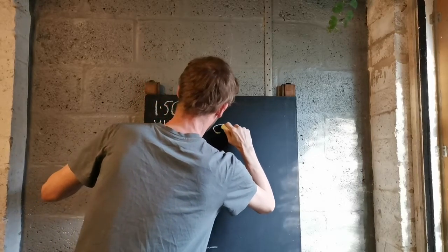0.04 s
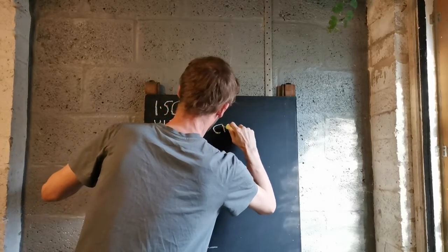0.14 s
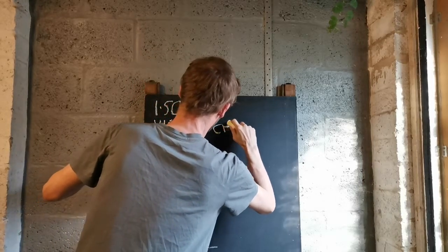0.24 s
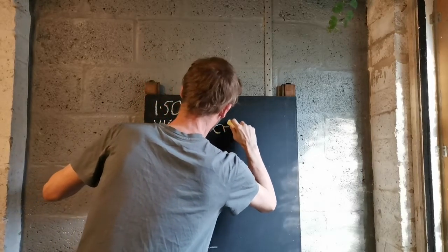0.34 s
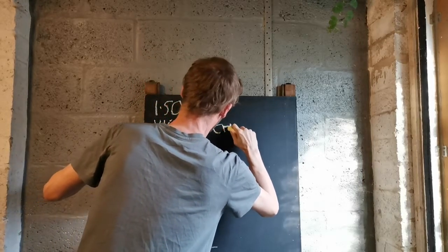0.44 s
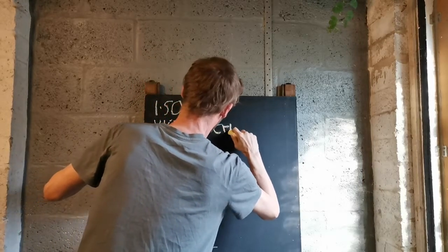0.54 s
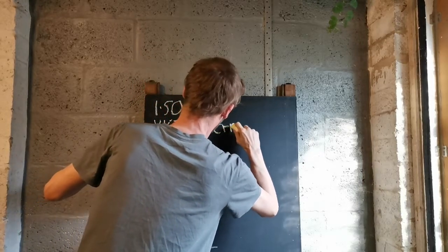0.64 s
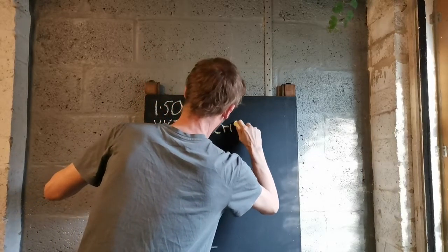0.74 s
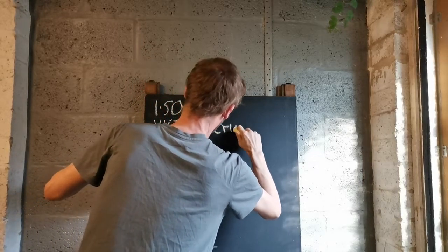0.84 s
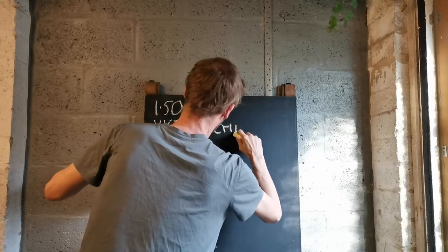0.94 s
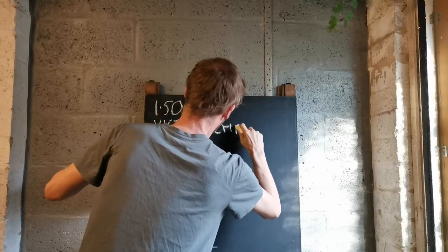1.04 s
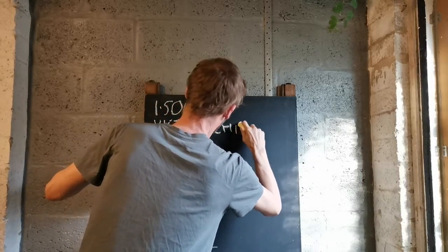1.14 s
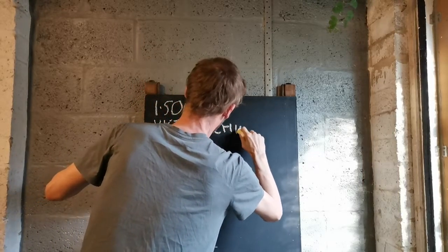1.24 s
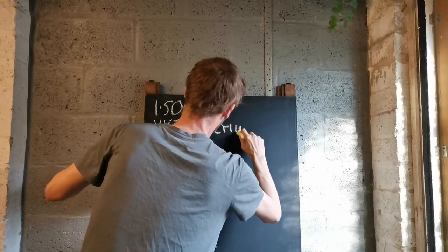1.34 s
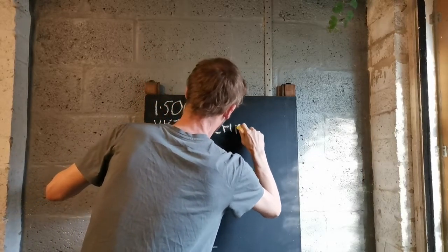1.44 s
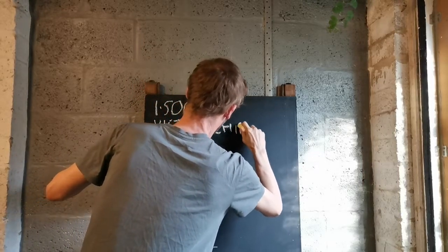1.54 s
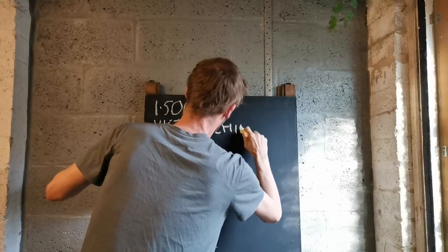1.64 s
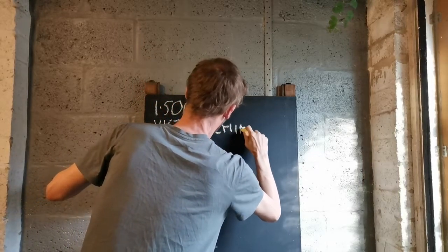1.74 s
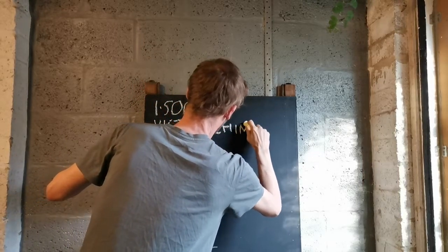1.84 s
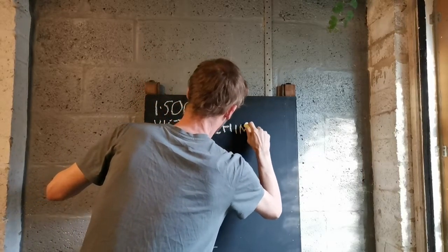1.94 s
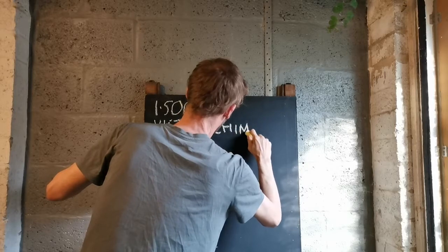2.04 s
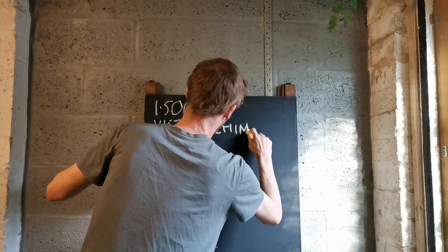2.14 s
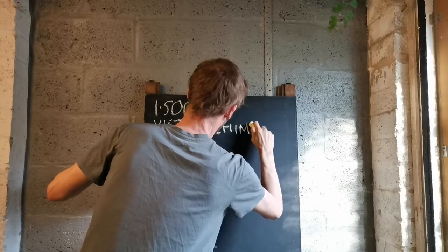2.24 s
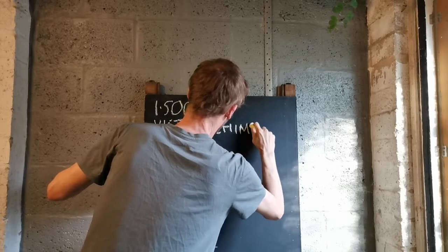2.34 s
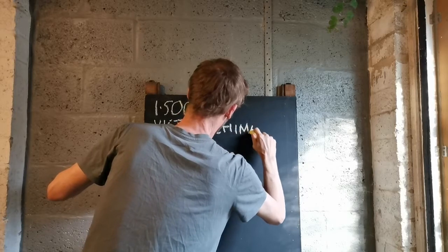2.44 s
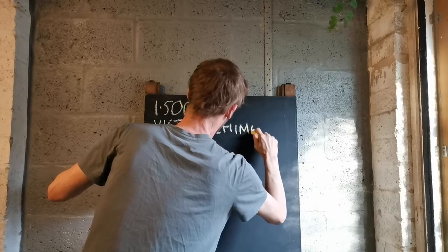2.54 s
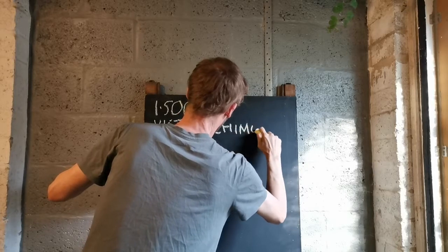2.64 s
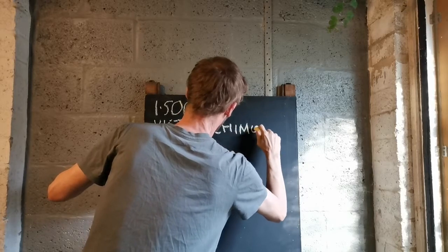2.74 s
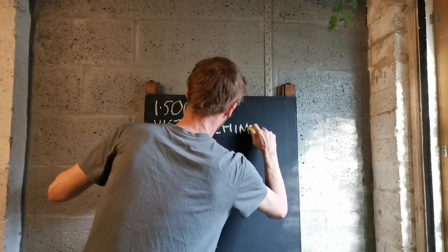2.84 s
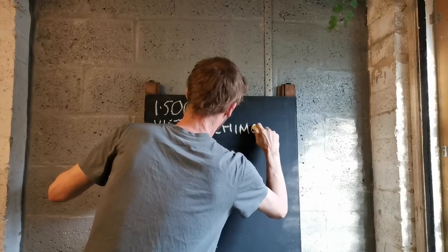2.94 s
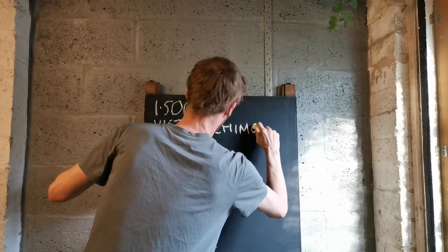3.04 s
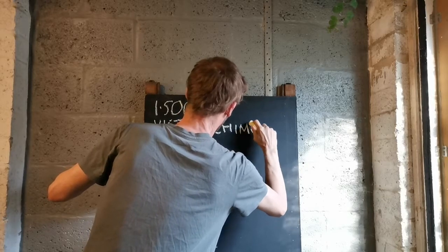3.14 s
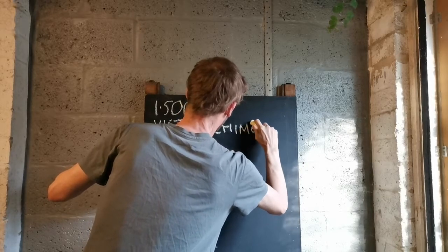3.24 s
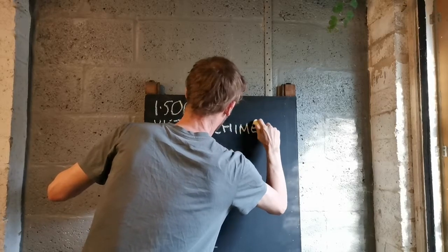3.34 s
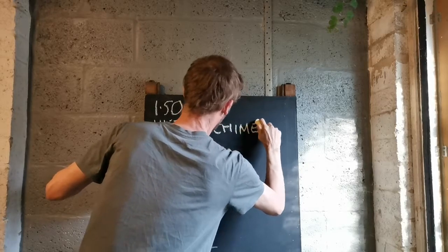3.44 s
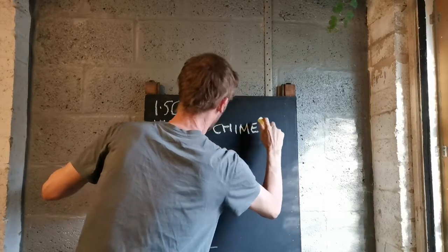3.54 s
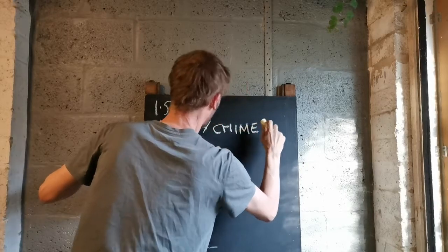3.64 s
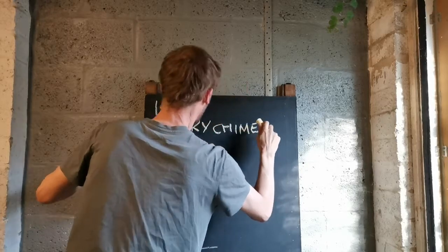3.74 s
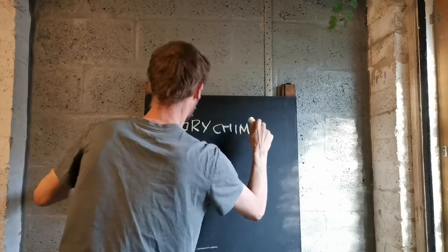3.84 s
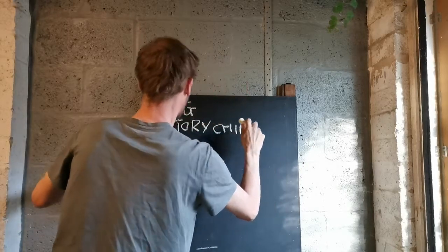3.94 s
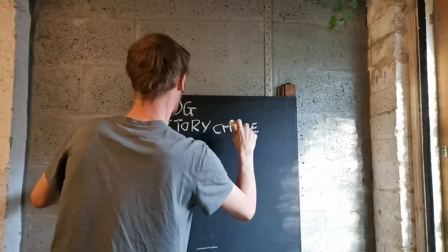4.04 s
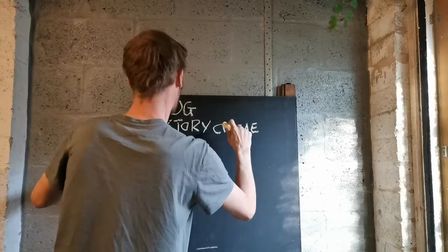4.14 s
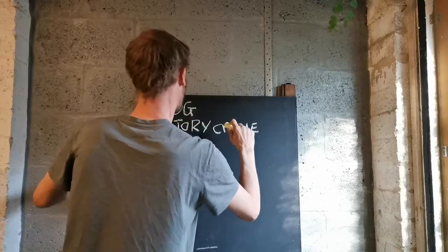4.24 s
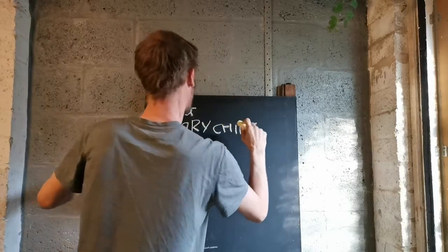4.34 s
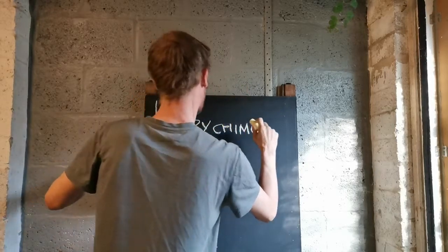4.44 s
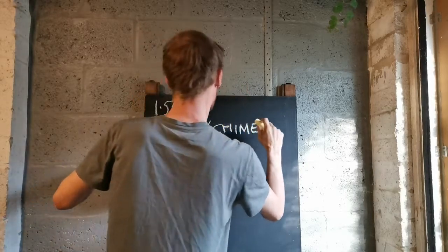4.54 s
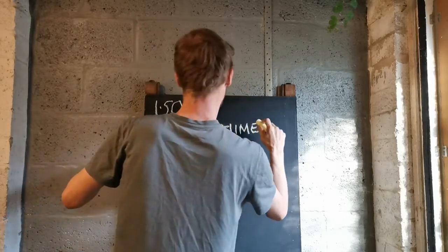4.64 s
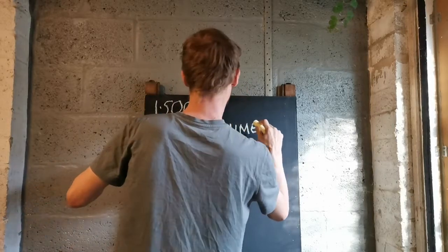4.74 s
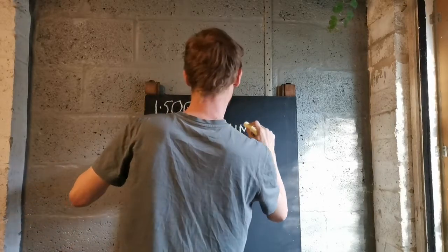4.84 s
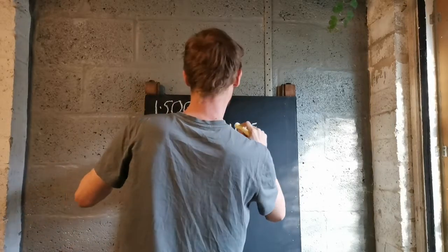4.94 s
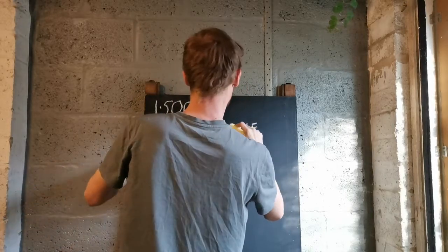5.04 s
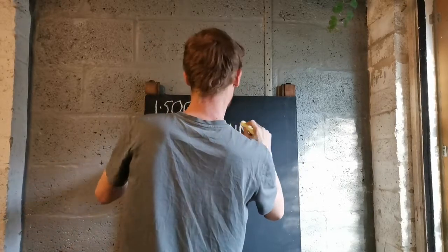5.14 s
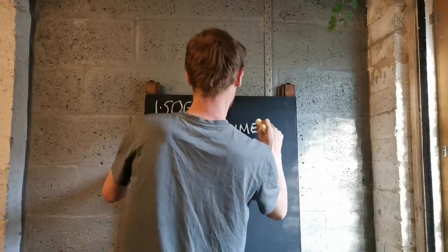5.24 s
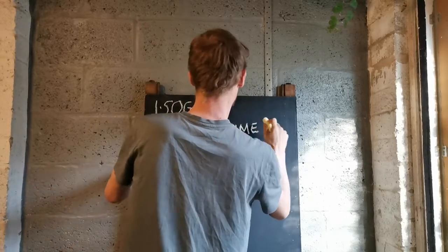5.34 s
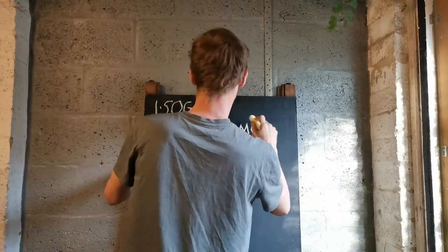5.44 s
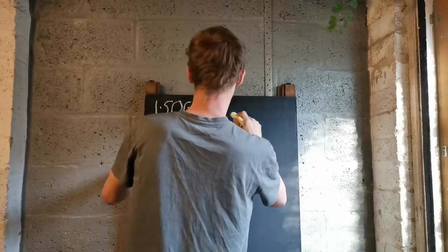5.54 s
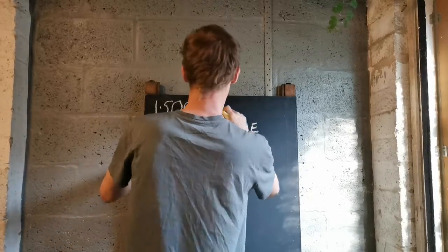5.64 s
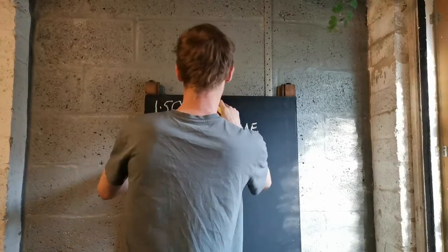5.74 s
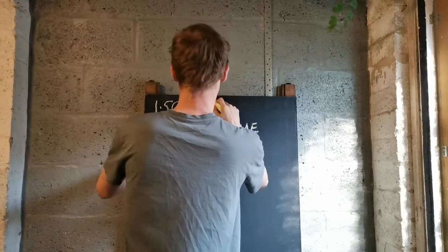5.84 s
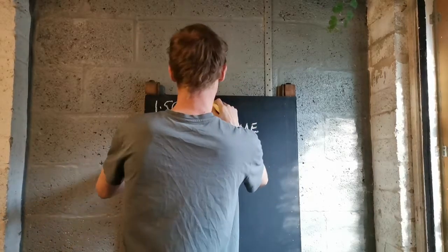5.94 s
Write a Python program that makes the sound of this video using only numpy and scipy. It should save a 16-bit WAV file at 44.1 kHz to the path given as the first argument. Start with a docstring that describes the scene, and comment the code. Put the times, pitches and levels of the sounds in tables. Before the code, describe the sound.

Chalk taps and gritty strokes write on a resonant wooden blackboard, then a pause with faint shoe scuffs and a soft double knock.

```python
"""Quiet room and microphone noise with a low shuddering hum of the board, then a hand writes with chalk.
Each tap rings the wooden board's modes; grit under the moving chalk hisses, chatters and shakes the same board.
In the pause, filtered grit noise makes shoes scuff on the floor, and soft knocks of hand or foot against
the easel ring the board's modes.
The small hard-walled room adds random echoes; a stereo microphone listens a metre or two away."""
import sys
import numpy as np
from scipy import signal
from scipy.fft import rfft, irfft, next_fast_len
from scipy.io import wavfile
from scipy.ndimage import uniform_filter1d

SR = 44100
rng = np.random.default_rng(int(sys.argv[2]) if len(sys.argv) > 2 else 0)


def to_wav(s):
    """Save 16-bit WAV."""
    ch = np.atleast_2d(s).T  # columns
    pcm = np.round(np.clip(ch, -1, 1) * 32767)  # PCM
    wavfile.write(sys.argv[1], SR, pcm.astype(np.int16))


N = 265041


def amp(db):
    """Decibels to gain."""
    return 10 ** (np.asarray(db) / 20)


def evened(x):
    """Scales to rms 1."""
    return x / np.sqrt(np.mean(x ** 2) + 1e-20)


def read(points, hz):
    """Interpolates a (frequency, value) table on a log frequency axis."""
    f, value = np.transpose(points)
    return np.interp(np.log(hz + 1), np.log(f + 1), value)


def filtered(x, order, hz, kind="low"):
    """Butterworth filter."""
    return signal.sosfilt(signal.butter(order, hz, kind, fs=SR, output="sos"), x)


def coloured(x, points):
    """Filters by a spectrum table in dB."""
    size = next_fast_len(len(x))
    gain = amp(read(points, np.fft.rfftfreq(size, 1 / SR)))
    return irfft(rfft(x, size) * gain, size)[:len(x)]


def resonate(x, hz, width_hz):
    """One resonance of about unit peak gain; hz may be an array that moves."""
    r = np.exp(-np.pi * width_hz / SR)
    if np.ndim(hz) == 0:
        return 2 * signal.lfilter([1 - r], [1, -r * np.exp(2j * np.pi * hz / SR)], x).real
    turn = np.exp(2j * np.pi * np.cumsum(hz) / SR)
    return 2 * (turn * signal.lfilter([1 - r], [1, -r], x / turn)).real


def grains(per_s, spread_db):
    """Tiny breakages at random moments, of random sign and size, at rms 1."""
    size = amp(spread_db * np.minimum(rng.exponential(1, N), 5))
    sign = rng.choice([-1., 1.], N)
    return evened(size * sign * (rng.random(N) < per_s / SR))


def slow(per_s):
    """Random wander of rms 1."""
    lowpass = signal.butter(2, per_s, fs=SR, output="sos")
    return evened(signal.sosfiltfilt(lowpass, rng.standard_normal(N)))


def dying(x, t60):
    """Lets every band of x fade at its own speed."""
    hz, t, z = signal.stft(x, SR, nperseg=256)
    fade_db = -60 * t / np.maximum(read(t60, hz), .02)[:, None]
    return signal.istft(z * amp(fade_db), SR, nperseg=256)[1][..., :x.shape[-1]]


# noise spectrum shape: freq_hz, relative_db_per_hz
QUIET_SPECTRUM = [(12, -27), (20, -3), (27, -10), (74, 5), (119, -25), (197, -9.5), (226, -15.5),
                  (253, -9.5), (308, -18), (939, -22), (1020, -19.5), (1780, -28), (4000, -31),
                  (10000, -49), (15700, -35.5)]
# left-right likeness of the noise: freq_hz, correlation
QUIET_LIKENESS = [(60, 0.12), (300, 0.24), (1400, 0.27), (4000, 0.01)]
QUIET_RMS_DB = -59


def quiet():
    """Steady room and microphone noise with slight drifting patches."""
    frames, hz = N // 256 + 5, np.fft.rfftfreq(1024, 1 / SR)
    a, b, c, d, patches = rng.standard_normal((frames, 513, 5)).T
    patches = evened(uniform_filter1d(uniform_filter1d(patches, 12, 0), 14, 1))
    same = np.clip(read(QUIET_LIKENESS, hz), -1, 1)[:, None]
    left = a + 1j * b
    right = same * left + np.sqrt(1 - same ** 2) * (c + 1j * d)
    z = np.array([left, right]) * amp(read(QUIET_SPECTRUM, hz)[:, None] + 0.44 * patches)
    return amp(QUIET_RMS_DB) * evened(signal.istft(z, nperseg=1024, noverlap=768)[1][:, :N])


# chalk strokes, also played by gesture(): fastest_s, speed_up_s, slow_down_s, hiss_db (6.8-9.5 kHz band),
# board_shake_db (relative), chatter_early_hz, chatter_late_hz, stick_squeak_db (relative), hand_push_db
CHALK_STROKES = [(0.23, 0.1, 0.083, -56.5, 0, 683, 870, 15, -43.5),
                 (0.59, 0.15, 0.085, -57, 1.5, 746, 854, 5, -38.5),
                 (0.975, 0.11, .11, -55, 0, 700, 1046, 14, -45),
                 (1.36, 0.098, 0.1, -53.5, -1.5, 650, 880, 17, -42),
                 (1.57, 0.15, 0.1, -58, 5, 508.8, 740, 17, -43),
                 (1.74, 0.11, .1, -53.5, -3.5, 1166, 980, 18.5, -62),
                 (1.93, 0.1, 0.091, -53, 4, 554, 575, 2, -45.5),
                 (2.125, 0.099, 0.12, -52.5, -1, 1050, 576, 15, -46),
                 (2.53, 0.17, 0.13, -57.5, -2, 620, 817, 7, -41.5),
                 (2.765, 0.077, .085, -56.5, 2, 735.6, 550, 10, -59),
                 (3.07, 0.11, 0.077, -62, 2.5, 700, 770, 8, -41),
                 (3.4, 0.071, 0.097, -62.5, 0.5, 650, 740, 7.5, -46),
                 (3.545, 0.096, 0.045, -78, 4.5, 620, 613, 16, -51.5)]
PUSH_RISE_DB_PER_S, PUSH_FALL_DB_PER_S, PUSH_LAG_S = 117, 60, .02
OPENING_PUSH_DB = -41.5  # still shuddering from the letter before


def shudder():
    """Uneven pushes of the hand keep the lowest modes and the frame humming on the supports."""
    push = grains(300, 3.5)
    led_in = np.r_[push[-SR // 4:], push]  # resonances already sounding at the start
    hum = np.zeros(N)
    for hz, width_hz, db in [(28, 10, -4.0), (45, 4.3, -2.5), (130, 31, 7.0), (198, 35, -7), (239.7, 8.1, -1)]:
        mode = resonate(resonate(led_in, hz, width_hz), hz, width_hz)[-N:]
        hum += amp(db) * evened(mode)
    t, power = np.arange(N) / SR, np.zeros(N)
    pushes = [(0, OPENING_PUSH_DB)] + [(row[0] + PUSH_LAG_S, row[-1]) for row in CHALK_STROKES]
    for s, db in pushes:
        lost_db = np.maximum(PUSH_RISE_DB_PER_S * (s - t), PUSH_FALL_DB_PER_S * (t - s))
        power += amp(db - lost_db) ** 2
    return np.sqrt(power) * evened(hum)


# clear modes of the board, also played by strokes(): freq_hz, relative_db, t60_s
BOARD_MODES = [(130.4, -9, 0.46), (240, 0.5, .16), (344.6, -1, 0.18), (509.6, 3, 0.13), (587.7, -1.5, 0.2),
               (660, -31, 0.36), (814, -19, 0.2), (790, -5, 0.18), (791.3, -1, 0.2), (920, -4.5, 0.11),
               (964, -16.5, .14), (1121.4, 2.5, 0.084), (1224, 2.5, 0.11), (1231, -10.5, 0.29),
               (1470, -15.5, .13), (1529, -7.5, 0.059), (1884, -17, 0.16), (1918, -24.5, 0.074),
               (1951, -8, 0.11)]


def ring(strength_db, t):
    """Dying sine modes; neighbours in the table swing in opposite directions at the microphone."""
    out = np.zeros(len(t))
    for k, ((hz, db, t60_s), spot_db) in enumerate(zip(BOARD_MODES, strength_db)):
        out += (-1) ** k * amp(db + spot_db - 60 * t / t60_s) * np.sin(2 * np.pi * hz * t)
    return out


# chalk tip landing, also played by gesture(): start_s, peak_db (nominal), contact_ms (time constant),
# upper_modes_db, chipping_db, mode1_db, mode2_db, mode3_db, mode4_db (at that spot), crushed_grit_db
CHALK_TAPS = [(0.098, -9.5, 0.087, 2.5, -20, 3.5, 2, -6, 0, -73),
              (0.467, -6, 0.022, 2, -14.5, 2.5, 2, -12.5, -3, -60.5),
              (0.859, -10, 0.1, 2, -19, -2, 1.5, -5.5, -1, -56.5),
              (1.248, -10, 0.11, 2.5, -23, 0, -0.5, -1, 2.5, -71),
              (2.406, -5, 0.028, 1, -8.5, -8, -4, 1, 1.5, -63.5),
              (2.969, -6, 0.021, 2, -10.5, -4.5, -5.5, 0, 0.5, -55.5),
              (3.315, -7.5, 0.021, 2.5, -12, -7, -4.5, -1.5, 0, -64)]
# soft knocks of hand or foot against the easel: start_s, peak_db (nominal), contact_ms (time constant),
# upper_modes_db, mode1_db, mode2_db, mode3_db, mode4_db
SOFT_KNOCKS = [(3.692, -38.5, .15, -2, 1, -6.5, 5.5, 3.5), (3.726, -28, 0.23, -1.5, 5.5, 6.5, 9, -1),
               (5.771, -46, .12, -2, 10, 11.5, 8, 1), (5.86, -22.5, 0.7, 0, 1.5, 5, -6.5, 9),
               (5.869, -16.5, 0.45, -6.5, -11.5, 3.5, -3, 7.5)]
# crowded upper modes, heard as a dying noise: freq_hz, relative_db_per_hz
CROWD_SPECTRUM = [(150, -14.5), (300, -12.5), (700, -1.5), (1500, -6.5), (2200, -17), (3300, -15.5),
                  (4600, -15.5), (5300, -30), (8000, -37.5), (12000, -60.5)]
# their decay: freq_hz, t60_s
CROWD_DECAY = [(150, 0.66), (500, 0.13), (1500, 0.24), (4000, 0.087), (9000, 0.26)]
CHIP_T60_S = .04  # the brittle tip chips at first contact


def taps():
    """A short push from a chalk tap or soft knock rings the board; each new spot shifts the mode strengths."""
    t, out = np.arange(SR // 2) / SR, np.zeros(N + SR)
    blows = [(*row[:4], amp(row[4]), row[5:9]) for row in CHALK_TAPS]
    blows += [(*row[:4], 0, row[4:]) for row in SOFT_KNOCKS]  # soft knocks do not chip
    modes = len(BOARD_MODES)
    spots = rng.standard_normal((len(blows), modes + len(t)))
    for (s, db, contact_ms, crowd_db, chipping, lowest_db), spot in zip(blows, spots):
        noise = spot[modes:]
        crowd = dying(coloured(noise, CROWD_SPECTRUM), CROWD_DECAY)
        crowd *= amp(crowd_db) / np.sqrt(np.mean(crowd[:SR // 50] ** 2))
        chips = evened(filtered(noise[::-1], 4, [1600, 5200], "band"))
        crowd += chipping * amp(-60 * t / CHIP_T60_S) * chips
        strength_db = np.r_[lowest_db, 2.5 * spot[len(lowest_db):modes]]
        u = t[:400] * 1000 / max(contact_ms, .01)
        push = u ** 2 * np.exp(-u)  # longer contact, duller tap
        sound = np.convolve(ring(strength_db, t) + crowd, push)[:len(t)]
        early_rms = np.sqrt(np.mean(sound[:SR // 100] ** 2))
        at = round(s * SR)
        out[at:at + len(t)] += amp(db) * sound / (2 * early_rms)  # peak is about twice the early rms
    return out[:N]


ARCH_DB, ARCH_POWER = 22, 1.68  # hiss lost at either end of a stroke; roundness of the arch
SLOW_SHAKE_DB_PER_DB = .3  # extra shake per dB of lost hiss: slow chalk grinds lower
CRUSH_T60_S, CRUSH_HZ = .2, 650  # grit crushed as the tip lands: decay and chatter rate


def gesture():
    """Hiss, shake, chatter rate and squeak at every sample; where strokes overlap the louder one leads."""
    t = np.arange(0, N, 16) / SR
    columns = np.transpose(CHALK_STROKES)[..., None]
    s, rise_s, fall_s, db, shake_db, early_hz, late_hz, squeak_db, _ = columns
    u = np.where(t < s, (t - s) / rise_s, (t - s) / fall_s)
    lost_db = np.minimum(ARCH_DB * abs(u) ** ARCH_POWER, 200)
    tap_s, *_, crush_db = np.transpose(CHALK_TAPS)[..., None]
    since_s = t - tap_s
    crush_fade_db = -60 * np.maximum(since_s, 0) / CRUSH_T60_S
    dust = (amp(crush_db + crush_fade_db) ** 2 * (since_s >= 0)).sum(0)
    landed_s = tap_s[np.searchsorted(tap_s[:, 0], s[:, 0]) - 1]
    power = amp(db - lost_db) ** 2 * (t >= landed_s)  # no stroke hiss before the tip is down
    total = power.sum(0) + dust + 1e-30
    chatter_hz = early_hz + (late_hz - early_hz) * np.clip(.5 + u, 0, 1)
    shake_db = shake_db + SLOW_SHAKE_DB_PER_DB * np.minimum(lost_db, 30)
    controls = (np.sqrt(total),
                (power * shake_db).sum(0) / total,
                ((power * chatter_hz).sum(0) + dust * CRUSH_HZ) / total,
                (power * squeak_db).sum(0) / total)
    return [np.interp(np.arange(N) / SR, t, c) for c in controls]


# grit hiss spectrum: freq_hz, relative_db
GRIT_SPECTRUM = [(150, -34), (300, -14.5), (500, -22), (1100, -15), (1500, -10), (1900, -15.5),
                 (3000, -17.5), (4800, -19.5), (5500, -25), (6500, -23), (9000, -32), (10500, -44.5),
                 (13500, -44), (16000, -53.5)]
SQUEAK_HZ, GRAINS_PER_S = 6433, 4400
GRIND_DB, GRIND_PER_S = 2.5, 30  # the grip on the board comes and goes


def strokes():
    """Grit hisses at the tip, chatters at a gliding rate, shakes the board's modes and sings in the stick."""
    hiss, shake_db, chatter_hz, squeak_db = gesture()
    grit = grains(GRAINS_PER_S, 2.2) * hiss
    hz = np.fft.rfftfreq(N, 1 / SR)
    band = (hz > 6800) & (hz < 9500)  # the hiss levels refer to this band
    scale = np.sqrt((amp(read(GRIT_SPECTRUM, hz)) ** 2)[band].sum() / len(hz))
    low = filtered(grit * amp(shake_db + GRIND_DB * slow(GRIND_PER_S)), 2, 2500)
    # stick and slip crowd round the chatter rate
    force = 0.2 * low + 0.71 * resonate(low, chatter_hz * amp(.6 * slow(22)), 260)
    rasp = coloured(grit + force, GRIT_SPECTRUM)
    board = sum(amp(db) * resonate(force, f, 3.65 / t60_s) for f, db, t60_s in BOARD_MODES[2:])
    squeak = resonate(resonate(grit, SQUEAK_HZ, 190), SQUEAK_HZ, 400)
    return (rasp + 0.88 * board) / scale + amp(squeak_db) * squeak


# shoes on the floor and, last, the palm on the board: full_contact_s, rise_s, hold_s, t60_s, level_db,
# hollow_start_hz, hollow_end_hz, thump_db, scratch_db, rasp_db (all three relative), rub_top_hz
FLOOR_RUBS = [(3.697, 0.0069, .015, .2, -48, 496, 450, 5.5, -26, -23, 900),
              (3.73, 0.0092, 0.011, .2, -36, 338, 362, 9, -20, -30, 1200),
              (4.099, .03, 0.0074, .25, -56, 490, 417, -9, -9, -16, 1196),
              (4.349, .012, 0.023, .4, -40.5, 380, 320, 7, -12.5, -10, 1313),
              (4.451, .008, 0.012, .2, -57, 325, 400, 0, 1, 1, 1310),
              (4.727, .08, .03, .4, -62, 320, 400, -4, -10, -14, 1200),
              (4.865, .015, 0.032, .2, -49.5, 437, 415, -5, -21, -27, 1200),
              (4.931, 0.0092, 0.05, 0.24, -35, 410, 668, -14, -12.5, -42, 1280),
              (5.771, 0.0044, .01, .4, -59.5, 310, 285, -7, -14, -17, 1200),
              (5.867, .015, .02, 0.4, -39.5, 443, 444, -9, -51, -56, 750)]
# thin rasp spectrum: freq_hz, relative_db
SOLE_SPECTRUM = [(2500, -47), (4000, 6), (6800, 3.5), (9500, -11), (15500, -21.5)]
RUB_RISE_DB, RUB_LUMPS_DB = 28, 1.77
BRIGHT_FADE = 1.9  # scratch and rasp lose this many times the dB of the hollow rub


def scuffs():
    """Grit under a sole or a palm: a low hollow rub, a scratch and a thin rasp."""
    out = np.zeros(N)
    grit = grains(3500, 2.6) * amp(RUB_LUMPS_DB * slow(40))
    scratch = evened(filtered(np.roll(grit, SR // 200), 3, [900, 2900], "band"))
    rasp = evened(coloured(np.roll(grit, SR // 500), SOLE_SPECTRUM))
    for s, rise_s, hold_s, t60_s, db, start_hz, end_hz, thump_db, scratch_db, rasp_db, top_hz in FLOOR_RUBS:
        part = slice(round((s - 2 * rise_s) * SR), min(round((s + hold_s + t60_s) * SR), N))
        t = np.arange(part.start, part.stop) / SR - s
        hz = start_hz + (end_hz - start_hz) * np.clip(t / (hold_s + t60_s / 3), 0, 1)
        dull = filtered(grit[part], 5, top_hz)
        rub = resonate(dull, hz, 300) + 0.34 * resonate(dull, 1.7 * hz, 420)
        rub += amp(thump_db) * resonate(dull, 200, 140)
        fade_db = -60 * np.maximum(t - hold_s, 0) / t60_s
        bright = amp(scratch_db) * scratch[part] + amp(rasp_db) * rasp[part]
        sole = evened(rub) + amp((BRIGHT_FADE - 1) * fade_db) * bright
        out[part] += sole * amp(db + RUB_RISE_DB * np.minimum(t / rise_s, 0) + fade_db)
    return out


# reverberation: freq_hz, t60_s
ROOM_DECAY = [(100, 1), (300, 0.34), (1000, 0.11), (5000, 0.28)]
ROOM_DB = -12.5


def room(x):
    """Sparse echoes of random sign, partly shared by the ports, each band dying at its own speed."""
    echoes = np.zeros((2, SR))
    slots = np.arange(200, SR - 20, 20)
    at = slots + rng.integers(0, 20, (2, len(slots)))
    np.put_along_axis(echoes, at, rng.choice([-1., 1.], at.shape), 1)
    echoes[1] = 0.44 * echoes[0] + 0.32 * echoes[1]
    tail = dying(echoes, ROOM_DECAY)
    return signal.fftconvolve(x[None], tail / np.linalg.norm(tail[0]), axes=1)[:, :N]


# sound that arrives unscattered: freq_hz, power_share
UNSCATTERED = [(100, 1), (400, 1), (900, 0.41), (2400, 1), (6000, 0.025)]
# left port level over right: freq_hz, difference_db
LEFT_LEAN = [(60, -5), (400, -2.5), (1200, -2), (2500, -0.5), (5000, 2.5), (9000, 4.5), (14000, 5)]
# detours, one row per port (left, right): delay1_ms, delay2_ms, delay3_ms, delay4_ms
DETOURS_MS = [(0.301, 0.89, 1.9, 3.7), (0.437, 1.28, 1.6, 4.3)]
LEFT_LAG_S, SCATTER_GAIN = .00006, 0.68


def ports(x):
    """Body and walls scatter part of each band, unlike at each port; level and delay differ left to right."""
    size = next_fast_len(N + SR // 4)
    hz = np.fft.rfftfreq(size, 1 / SR)
    late = np.exp(-2j * np.pi * hz * np.array(DETOURS_MS)[..., None] / 1000)
    # allpass echoes smear time but keep the colour
    scatter = ((SCATTER_GAIN + late) / (1 + SCATTER_GAIN * late)).prod(axis=1)
    same = np.clip(read(UNSCATTERED, hz), 0, 1)
    half = amp(read(LEFT_LEAN, hz) / 2) * np.exp(-1j * np.pi * hz * LEFT_LAG_S)
    heard = (np.sqrt(same) + np.sqrt(1 - same) * scatter) * np.array([half, 1 / half])
    return irfft(rfft(x, size, axis=1) * heard, size, axis=1)[:, :N]


def scene():
    """Board and shoes in the room, through the ports, over the noise."""
    near = taps() + strokes() + scuffs()
    near = filtered(near, 4, 105, "high")  # small bodies radiate no deep bass
    near = near + shudder()
    return ports(near + amp(ROOM_DB) * room(near)) + quiet()


EDGE_HZ = 15800


def record(dry):
    """Band limit: a linear-phase lowpass."""
    lowpass = signal.firwin(511, EDGE_HZ, window=("kaiser", 9), fs=SR)
    return signal.oaconvolve(dry, lowpass[None], "same")


dry = scene()
out = record(dry)
to_wav(out)
```